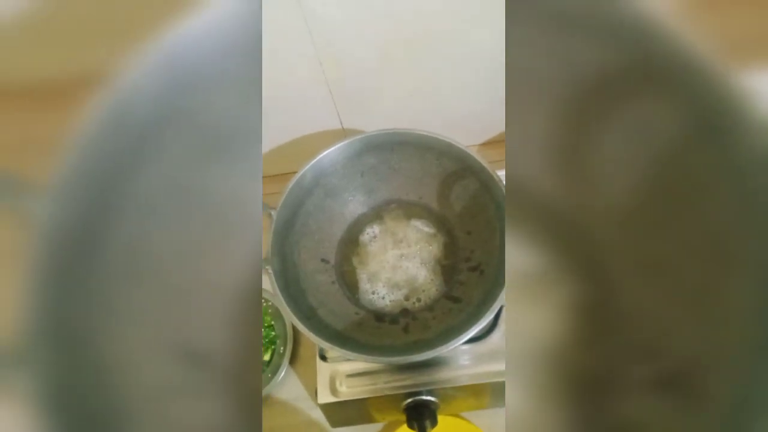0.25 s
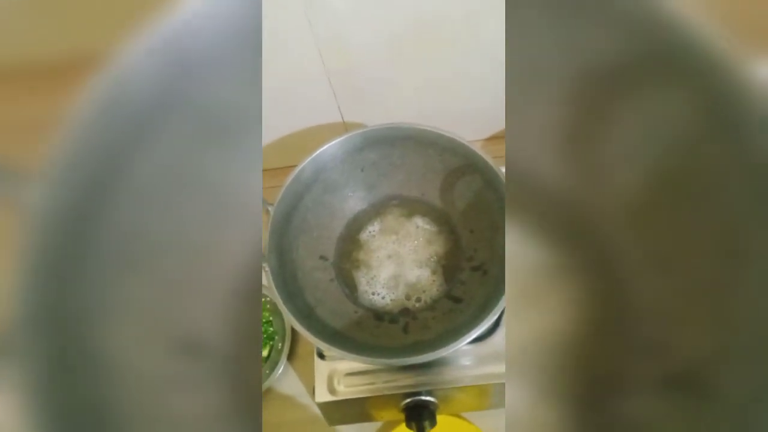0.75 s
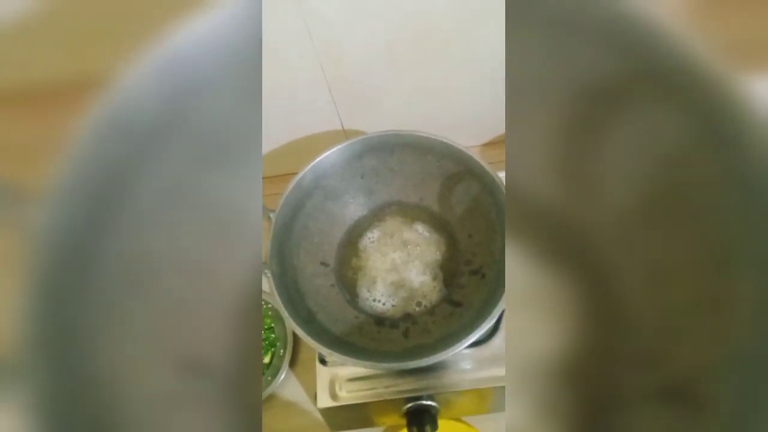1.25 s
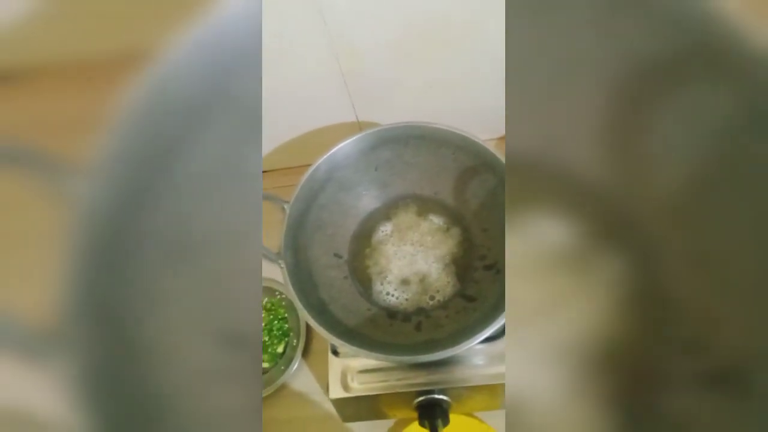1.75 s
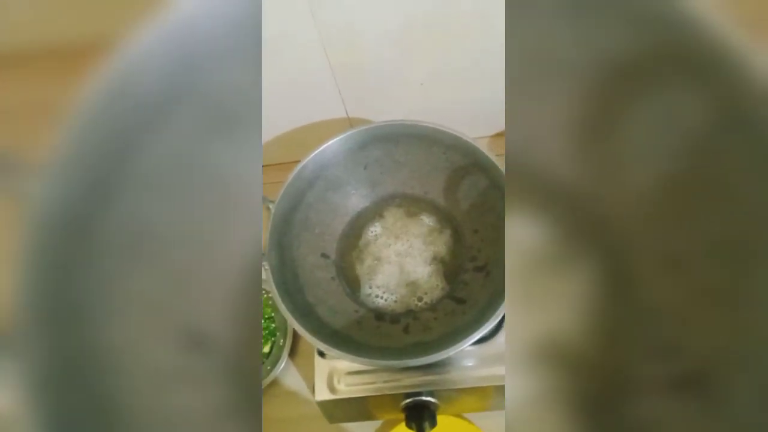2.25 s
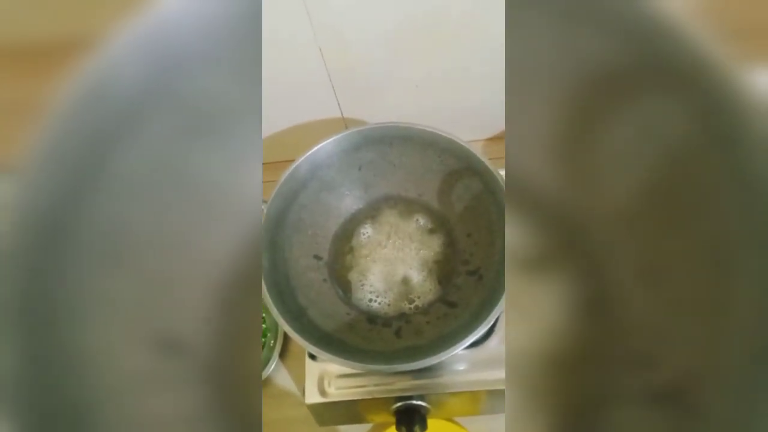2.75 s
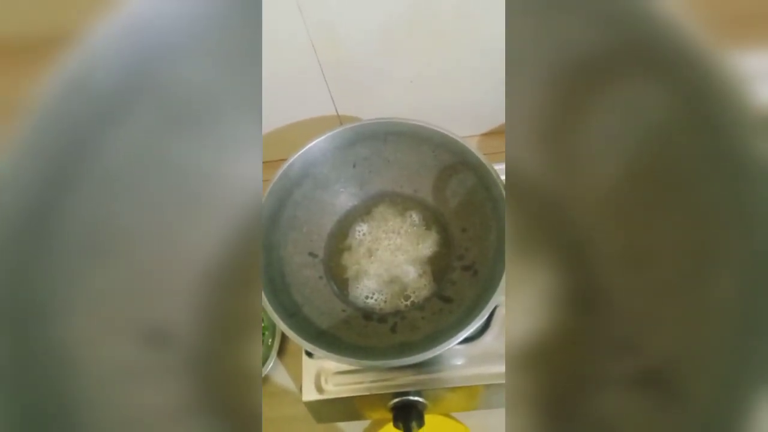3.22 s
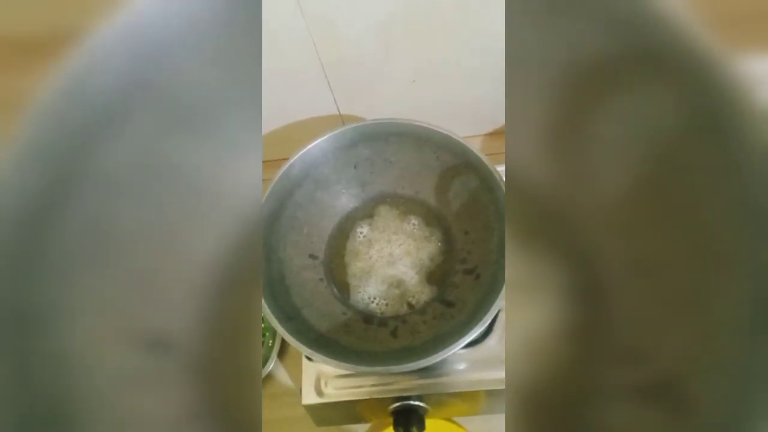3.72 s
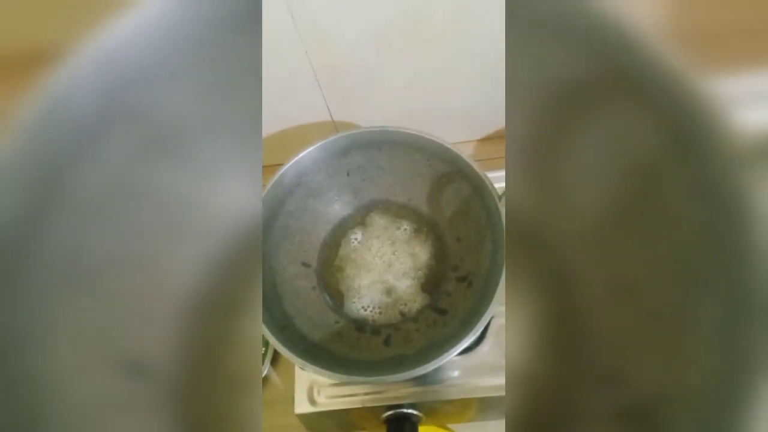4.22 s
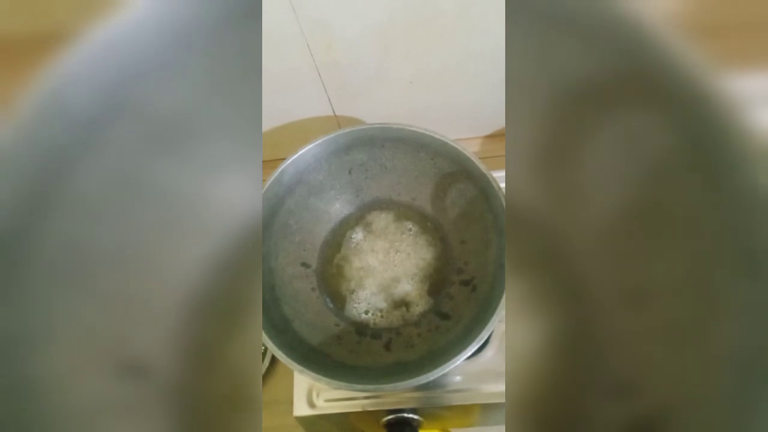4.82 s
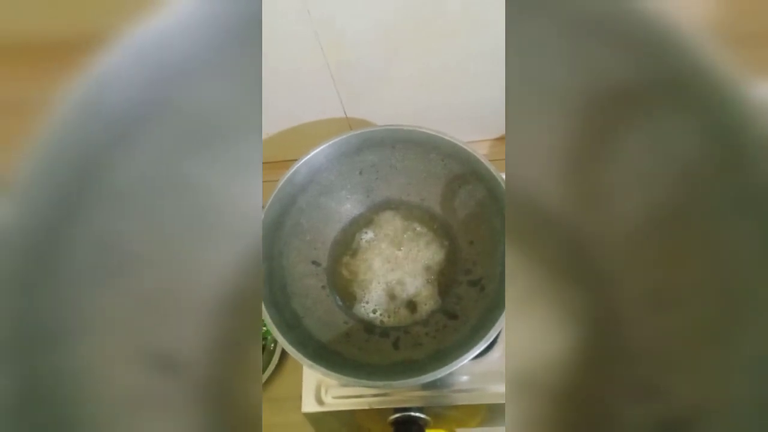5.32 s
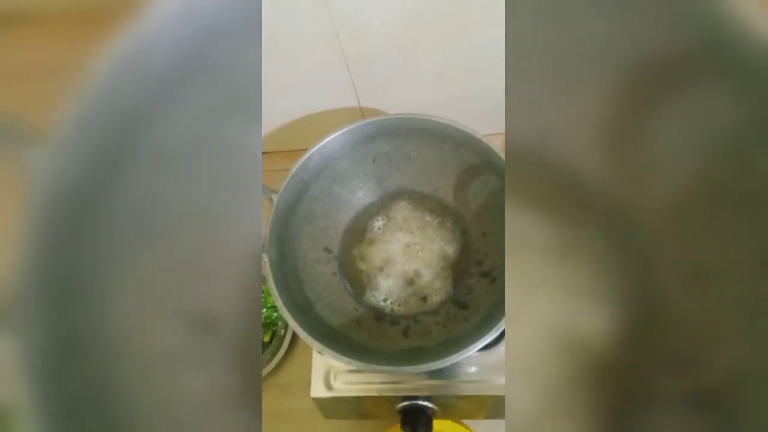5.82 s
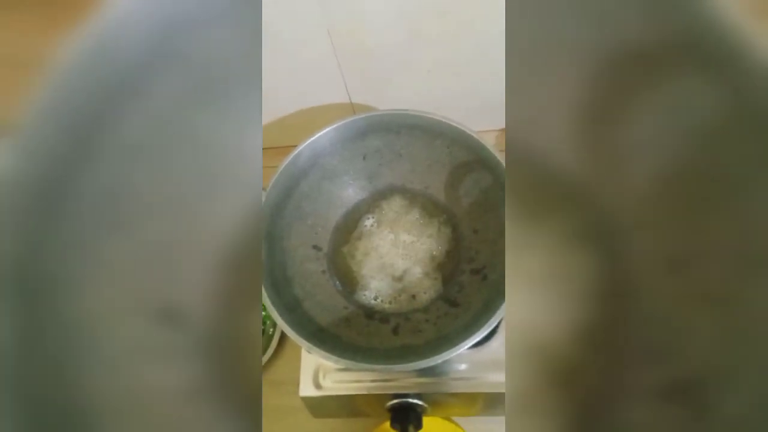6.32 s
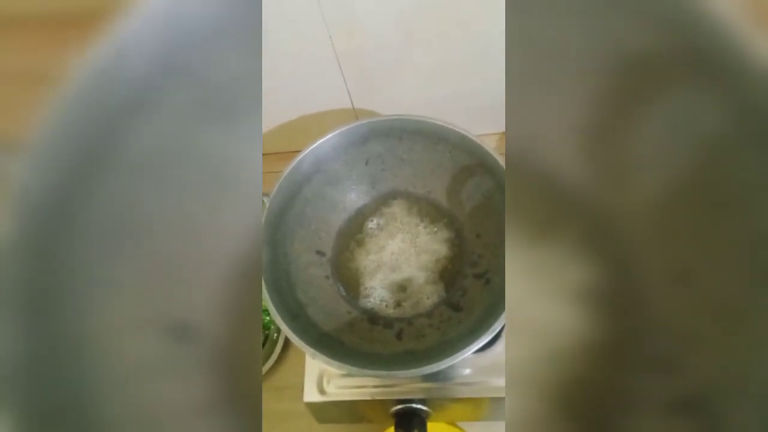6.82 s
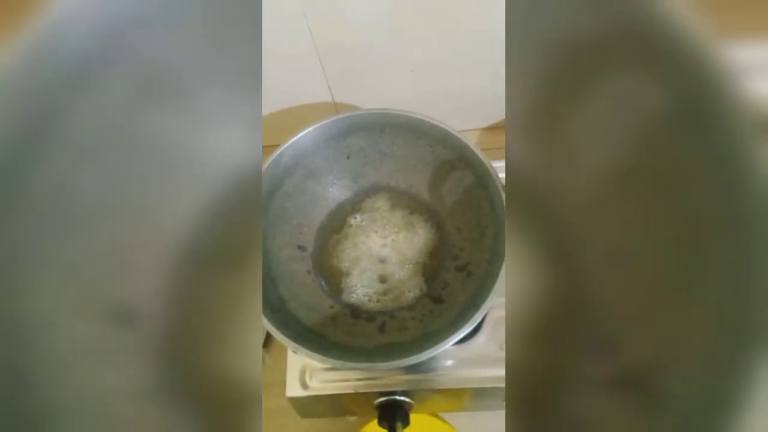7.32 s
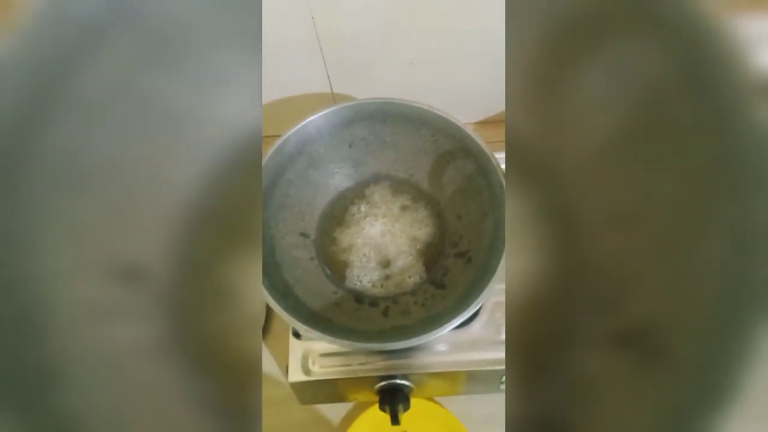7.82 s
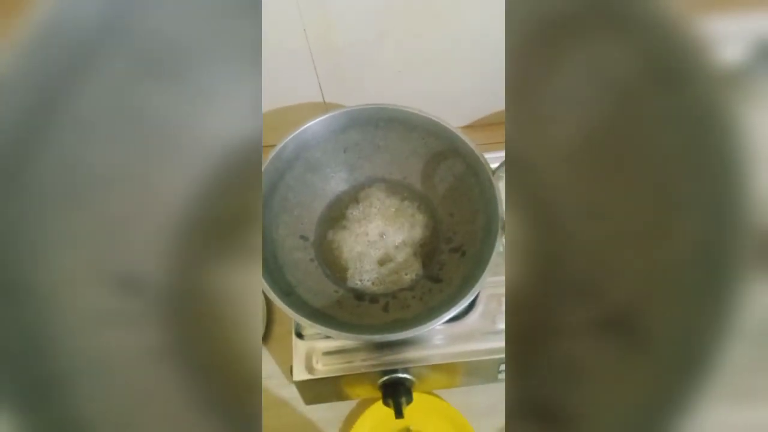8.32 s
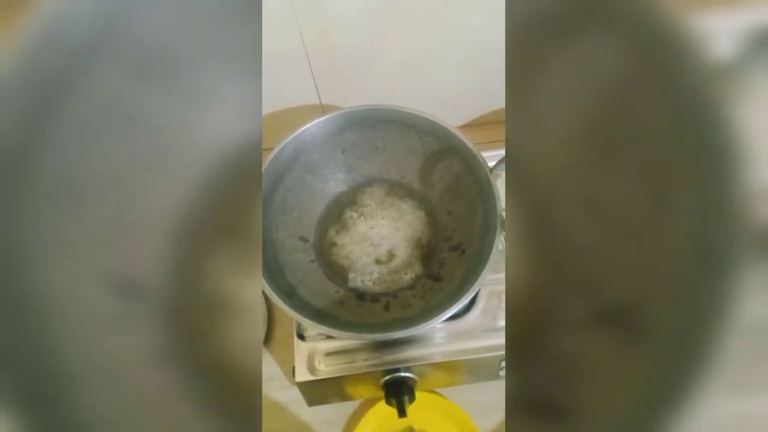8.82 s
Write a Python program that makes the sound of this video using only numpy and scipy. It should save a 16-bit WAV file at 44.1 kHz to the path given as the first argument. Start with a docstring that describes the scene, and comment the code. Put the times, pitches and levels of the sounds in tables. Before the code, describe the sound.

Close phone pickup of seeds popping in a steel frying pan. Irregular clicks and hollow pops of varied loudness, some sharply cracking, echo briefly off hard kitchen walls. A thin patchy sizzle grows slowly underneath, with low bubbling plops and bright spitting droplets. Dull knocks sound farther off in the room now and then. The popping bunches into a dense flurry towards the end, with one of the loudest bursts just before it stops.

```python
"""Mustard seeds bursting in hot oil

Seeds burst in a round steel pan under a phone: damped-sine pops, snaps and noise cracks.
The pan rings on and a noise-tail reverb is the tiled kitchen. Steam bubbles plop as low damped sines,
froth crackles, droplets spit as filtered noise, oil fizzes as patchy noise with ticks. Further off: dull
knocks of noise and modes. Two faint squeaks are sines; a low rumble is noise in narrow wavering bands.
"""
import sys
import numpy as np
from scipy import signal
from scipy.fft import rfft, irfft, next_fast_len
from scipy.io import wavfile
from scipy.ndimage import uniform_filter1d

SR = 44100
rng = np.random.default_rng(int(sys.argv[2]) if len(sys.argv) > 2 else 0)


def file_out(sig):
    """Save sig as 16-bit WAV at sys.argv[1]."""
    # one column per channel
    cols = np.atleast_2d(sig).T
    # limit, then scale
    lim = np.clip(cols, -1, 1)
    pcm = np.round(lim * 32767).astype(np.int16)
    wavfile.write(sys.argv[1], SR, pcm)


N = 399546


def amp(db):
    """Decibels to amplitude."""
    return 10 ** (np.asarray(db) / 20)


def unit(x):
    """Scale to unit RMS."""
    return x / np.sqrt(np.mean(x ** 2) + 1e-20)


def along(points, hz):
    """Interpolate (frequency [Hz], value) points on a log-frequency axis."""
    f, value = np.transpose(points)
    return np.interp(np.log(hz + 1), np.log(f + 1), value)


def curve(rows):
    """Interpolate (time [s], value) rows to one value per sample."""
    return np.interp(np.arange(N) / SR, *np.transpose(rows))


def coloured(x, spectrum):
    """Minimum-phase filter, via the folded cepstrum of (frequency [Hz], gain [dB]) points."""
    size = 2 * next_fast_len(N // 2 + SR // 4)
    log_gain = along(spectrum, np.fft.rfftfreq(size, 1 / SR)) * np.log(10) / 20
    cepstrum = irfft(log_gain, size)
    cepstrum[1:size // 2] *= 2
    cepstrum[size // 2 + 1:] = 0
    return irfft(rfft(x, size) * np.exp(rfft(cepstrum)), size)[:N]


def placed(times_s, shapes):
    """Sum the rows of shapes, each laid down at its time."""
    at = np.round(times_s * SR).astype(int)[:, None] + np.arange(shapes.shape[1])
    return np.bincount(at.ravel(), shapes.ravel(), N + SR)[:N]


def rings(times_s, db, hz, t60_s, rise_s, size):
    """Resonances: exponentially damped sines with a soft start."""
    t = np.arange(size) / SR
    envelope = amp(-60 * t / t60_s) * (1 - np.exp(-t / rise_s))
    return placed(times_s, amp(db)[:, None] * envelope * np.sin(2 * np.pi * hz[:, None] * t))


def bursts(times_s, db, t60_s, size, lumpy_db=0):
    """Decaying white noise; lumpy_db sets slow level swings that break it into separate echoes."""
    t = np.arange(size) / SR
    noise, lumps = rng.standard_normal((2, len(times_s), size))
    lumps = unit(uniform_filter1d(lumps, 130))
    return placed(times_s, amp(db[:, None] - 60 * t / t60_s + lumpy_db * lumps) * noise)


def blips(times_s, db, wave, rise_s, round_off):
    """Wavelets that swell for rise_s, then die; a low round_off lets them linger."""
    u = np.arange(wave.shape[1]) / SR / rise_s
    envelope = (u * np.exp(1 - u)) ** round_off
    return placed(times_s, amp(db)[:, None] * envelope * wave)


def sines(hz, size, sag=0):
    """One sine a row; pitch starts high by 1.5 * sag and settles with a 1.4 ms time constant."""
    t = np.arange(size) / SR
    return np.sin(2 * np.pi * hz[:, None] * (t + sag * 0.0021 * (1 - np.exp(-t / 0.0014))))


def sprays(times_s, db, colour):
    """A noise click, a short spray behind it and the ceiling's later echo, all through one filter."""
    ceiling_delay_s = 0.0115
    click_noise = rng.standard_normal((len(times_s), 200))
    click = blips(times_s, db, click_noise, rise_s=0.00045, round_off=6.1)
    spray = bursts(times_s, db - 9.0, t60_s=0.036, size=800)
    ceiling = bursts(times_s + ceiling_delay_s, db - 11.0, t60_s=0.037, size=1200)
    return coloured(click + spray + ceiling, colour)


# Fizz RMS: (time [s], level [dB])
FRY_LEVEL = [(0.0, -65), (0.3, -77.5), (1.29, -57.5), (1.87, -66), (2.22, -64.5), (5, -60.5), (8.35, -58),
             (9.06, -57.5)]
# Fizz spectrum: (frequency [Hz], relative gain [dB])
FIZZ_TONE = [(88, -45), (150, -27.5), (443, -1.5), (524, 6), (935, -1.5), (1440, 0.5), (2130, 4),
             (3090, -6.5), (6890, -8), (13000, -30)]
PATCHY_DB = 3  # RMS of the hiss level swings
TICK_MIN_DB, TICK_RANGE_DB = 3, 10  # against the hiss, before the tick filter


def fizz(count=4000):
    """Frying: hiss, patchy in time and frequency, with tiny bubbles as ticks of noise."""
    bins = signal.stft(rng.standard_normal(N), nperseg=512)[2]
    field = rng.standard_normal(bins.shape)
    field = uniform_filter1d(uniform_filter1d(field, 6, 0), 8, 1)
    hiss = signal.istft(bins * amp(PATCHY_DB * unit(field)), nperseg=512)[1]
    hiss = unit(hiss[:N])
    u = rng.random((count, 2))
    tick_s = u[:, 0] * (N - 1) / SR
    ticks = bursts(tick_s, TICK_MIN_DB + TICK_RANGE_DB * u[:, 1], t60_s=0.0055, size=150)
    ticks = coloured(ticks, [(800, -25), (2000, 0)])  # too small for bass
    return amp(curve(FRY_LEVEL)) * unit(coloured(hiss + ticks, FIZZ_TONE))


# Rumble RMS: (time [s], level [dB])
RUMBLE_LEVEL = [(0.0, -81), (1.49, -76), (8.86, -79.5), (9.06, -66)]
# Rumble bands: (centre [Hz], full width at half amplitude [Hz], relative level [dB])
RUMBLE_BANDS = [(48, 8.7, -34), (90.6, 9.4, 1), (132.8, 8.4, -2.5)]


def rumble():
    """Low rumble: noise in narrow wavering bands."""
    f = np.fft.rfftfreq(N, 1 / SR)
    shape = sum(amp(db) / (1 + (2 * (f - c) / width) ** 2) for c, width, db in RUMBLE_BANDS)
    shape = shape / (1 + (45 / (f + 1)) ** 4)  # deep-bass cut
    return amp(curve(RUMBLE_LEVEL)) * unit(irfft(rfft(rng.standard_normal(N)) * shape, N))


# Prominent bursts: (time [s], level [dB], pitch [Hz], treble against level [dB])
SEED_BURSTS = [(0.1678, -32, 2100, -13.5), (0.4632, -29, 2100, -19), (0.5297, -22, 2350, -24),
               (0.5914, -28, 2640, -12.5), (0.6956, -35.5, 2300, -10), (0.8142, -25.5, 1690, -34),
               (0.854, -33, 2440, -3), (0.8876, -30, 1700, -16), (1.0248, -30, 2200, -20),
               (1.105, -24, 2350, -14), (1.294, -22, 2310, -14.5), (1.3451, -21, 2210, -19),
               (1.4557, -29, 1920, -30), (1.4729, -21, 2400, -14.5), (1.6194, -33.5, 2280, -17),
               (1.8482, -34, 2350, -19), (2.0345, -30, 2600, -12), (2.087, -16.5, 2320, -15),
               (2.1191, -34, 2220, -28), (2.2207, -37, 2100, -12), (2.3103, -30, 2360, -11.5),
               (2.35, -45, 2040, -9.5), (2.3795, -30.5, 2230, -17), (2.388, -28.5, 2020, -22),
               (2.4207, -33, 2150, -13), (2.4563, -33.5, 2060, -14.5), (2.5222, -26.5, 2500, -11.5),
               (2.5494, -29, 2330, -5.5), (2.5641, -29, 2000, -5.5), (2.6224, -28, 2000, -14),
               (2.6494, -30.5, 2200, -16), (2.7578, -33, 2100, -15), (2.7786, -43, 2090, -9.5),
               (2.8739, -39, 2360, -27), (2.918, -36, 2200, -13), (2.9527, -26, 2160, -28),
               (3.0669, -30, 2130, -11), (3.0728, -28.5, 2210, -16), (3.1163, -35, 3100, -19),
               (3.2459, -26, 2100, -14.5), (3.3213, -35, 2300, -2.5), (3.3796, -32.5, 1880, -20),
               (3.4265, -33.5, 1920, -26), (3.4715, -31, 2150, -17), (3.5333, -22.5, 2100, -25.5),
               (3.5504, -32.5, 2090, -12), (3.606, -33, 2320, -19.5), (3.6709, -23, 2100, -20.5),
               (3.7035, -36, 2230, -12.5), (3.7887, -41, 2050, -13), (3.8355, -35, 2130, -9.5),
               (3.908, -31, 2300, -6), (3.982, -33, 2240, -22), (3.992, -36.5, 2230, -17),
               (4.1659, -33.5, 2030, -12), (4.2408, -27, 2090, -16), (4.2638, -31.5, 2170, -7),
               (4.3536, -25.5, 2470, -10.5), (4.3944, -35.5, 2130, -15), (4.4431, -31.5, 2230, -17),
               (4.5067, -28.5, 2300, -14.5), (4.5303, -26, 2170, -11.5), (4.667, -32.5, 2160, -11.5),
               (4.6992, -26.5, 2290, -22), (4.7408, -26, 2320, -11), (4.7591, -26, 2800, -12),
               (4.8, -28, 2290, 0.5), (5.029, -20, 1820, -16), (5.1415, -31.5, 2140, -16),
               (5.1652, -30.5, 2220, -15), (5.1928, -34.5, 2320, -16), (5.2228, -32.5, 2190, -29),
               (5.3183, -33, 2180, -22), (5.3507, -26.5, 2150, -29), (5.3568, -26, 2590, -12.5),
               (5.4793, -22.5, 2130, -25), (5.4887, -31, 1930, -3.5), (5.5695, -25, 2110, -19),
               (5.6341, -33.5, 2200, -14), (5.7399, -29.5, 2150, -11), (5.831, -21, 2250, -18.5),
               (5.84, -32.5, 1930, -16), (5.9349, -18, 2180, -12.5), (5.9943, -35, 2030, -11),
               (6.0384, -25, 1900, -10.5), (6.1539, -30.5, 2480, -13), (6.1627, -33, 2770, -15),
               (6.209, -28, 2600, -10), (6.2816, -31.5, 2480, -21), (6.2973, -32.5, 2760, -12),
               (6.302, -33, 2900, -16), (6.317, -27, 2540, -15), (6.3578, -25, 1980, -20),
               (6.3712, -35, 2000, -14), (6.3892, -28.5, 2270, -26), (6.3985, -32, 2080, -4),
               (6.4092, -23.5, 2020, -16.5), (6.4651, -24, 2300, -14), (6.557, -26.5, 2150, -22),
               (6.5634, -29.5, 2060, -10.5), (6.6558, -30.5, 2070, -26), (6.7849, -21.5, 2140, -15),
               (6.8457, -23.5, 2100, -17), (6.998, -23.5, 2180, -18.5), (7.0947, -27.5, 2450, -13),
               (7.1377, -35, 2320, -19), (7.1482, -33, 2030, -26), (7.2255, -33, 1940, -21),
               (7.2549, -27, 2020, -15.5), (7.2796, -28.5, 2070, -11), (7.3431, -36, 2200, -13),
               (7.423, -27, 2410, -22), (7.5322, -34.5, 2790, -6), (7.5454, -34, 2160, -12),
               (7.649, -26, 1980, -14.5), (7.7323, -34, 2180, -12), (7.7982, -41, 2300, -13),
               (7.8645, -45, 2470, -12), (7.889, -37, 2130, -6.5), (7.957, -34, 2840, -26),
               (7.9829, -22, 2180, -18.5), (8.091, -29.5, 2100, -25.5), (8.1637, -48, 2070, -7),
               (8.254, -30, 2520, -16), (8.2733, -32.5, 2080, -16), (8.3003, -30, 2350, -17),
               (8.3594, -34.5, 2250, -6), (8.391, -28, 2240, -13), (8.4459, -20, 2140, -24),
               (8.477, -26, 2260, -14), (8.5104, -22.5, 2320, -15.5), (8.542, -26, 2280, -17),
               (8.5618, -28, 2780, -18), (8.6258, -26.5, 2170, -25), (8.6422, -26.5, 2220, -17),
               (8.6605, -27, 2300, -11), (8.6681, -22.5, 2200, -20), (8.6824, -34, 1980, -19),
               (8.7045, -27, 2590, -20), (8.717, -28.5, 2110, -20), (8.763, -31, 2050, -11.5),
               (8.8025, -28, 2400, -23), (8.8535, -36, 2060, -7), (8.8599, -33.5, 1980, -7.5),
               (8.8835, -29, 2010, -10), (8.9279, -15, 2300, -14), (8.935, -24, 2010, -10)]
SMALL_MIN_DB, SMALL_SPREAD_DB = -42, 2  # floor, mean excess
SMALL_MIN_HZ, SMALL_MAX_BRIGHT_DB = 2100, -8


def all_pops(count=45):
    """Listed bursts plus faint random ones, denser where the oil fries harder."""
    u = rng.random((count, 4))
    heat = np.cumsum(amp(curve(FRY_LEVEL)))
    s = np.interp(u[:, 0], heat / heat[-1], np.arange(N) / SR)
    db = SMALL_MIN_DB - SMALL_SPREAD_DB * np.log(1 - u[:, 1])
    hz = SMALL_MIN_HZ * 1.55 ** (u[:, 2] ** 2)
    bright_db = SMALL_MAX_BRIGHT_DB - 10 * u[:, 3]
    return np.hstack([np.transpose(SEED_BURSTS), [s, db, hz, bright_db]])


# Crack spectrum: (frequency [Hz], gain [dB])
CRACK_TONE = [(800, -73), (3000, -50), (4800, -2.5), (7000, -4.5), (8500, -18), (11000, -28.5),
              (13500, -35.5), (15200, -24)]
# Steel bowl and the air in it: (frequency [Hz], relative level [dB], t60 [s])
PAN_MODES = [(521.5, -45, 0.53), (584.5, -44.5, 0.21), (844, -29, 0.067), (1261, -21.5, 0.042),
             (2184, -7.5, 0.02)]
POP_DB, PAN_DB = -1.5, -4  # offsets from burst level
SNAP_DB, CRACK_DB = 5.5, 12  # offsets from burst level + treble
SNAP_SCATTER_DB = 4  # plus or minus
ONSET_DELAY_S = 0.0006  # short delay from listed time to burst


def seeds(pops):
    """Husk split: a few cycles of pop with a higher snap and a noise crack; pan modes ring on."""
    s, db, hz, bright_db = pops
    s = np.minimum(s + ONSET_DELAY_S, N / SR)
    u = rng.random((len(s), 3))
    pop_wave = sines(hz, size=400, sag=0.08)
    pop = blips(s, db + POP_DB, pop_wave, rise_s=0.00045, round_off=1.15)
    snap_db = db + bright_db + SNAP_DB + SNAP_SCATTER_DB * (2 * u[:, 2] - 1)
    snap_wave = sines(3000 + 1400 * u[:, 0], size=400)
    snap = blips(s, snap_db, snap_wave, rise_s=0.0004, round_off=1.4)
    pan_db = db + PAN_DB + 6 * u[:, 1]
    pan = sum(rings(s, pan_db + mode_db, f + 0 * s, t60_s, rise_s=0.0032, size=9000)
              for f, mode_db, t60_s in PAN_MODES)
    return pop + snap + pan + sprays(s, db + bright_db + CRACK_DB, CRACK_TONE)


FROTH_DB = -14  # top level against the burst, before the lateness loss


def crackle(pops, count=8):
    """Stirred froth: smaller bubbles break right behind each burst, tending fainter when later."""
    s, db = np.repeat(pops[:2], count, axis=1)
    u = rng.random((len(s), 3))
    late_s = 0.0015 + 0.08 * u[:, 0] ** 3
    level_db = db + FROTH_DB - 10 * u[:, 1] - 12 * np.sqrt(late_s / 0.17)
    wave = sines(1700 * 2.33 ** u[:, 2], size=400)
    times_s = np.clip(s + late_s, 0, (N - 1) / SR)
    return blips(times_s, level_db, wave, rise_s=0.00071, round_off=0.75)


# Steam bubbles breaking the oil: (time [s], level [dB], pitch [Hz])
STEAM_PLOPS = [(0.471, -50, 550), (1.119, -49, 510), (2.243, -45.5, 593), (2.385, -37, 586),
               (3.246, -44, 845), (3.426, -36.5, 512), (4.012, -49.5, 581), (4.217, -49, 816),
               (4.326, -51.5, 505), (4.409, -41, 818), (4.487, -40, 530), (5.142, -46.5, 580),
               (5.341, -39.5, 548), (5.435, -44.5, 504), (5.518, -39.5, 550), (5.595, -44.5, 533),
               (6.186, -41, 512), (7.05, -47, 790), (7.299, -45, 568), (7.648, -43.5, 770),
               (7.83, -44, 520), (8.274, -36, 532), (8.627, -43, 540), (8.92, -48, 603)]


def bubbles():
    """Large steam bubbles: a short dull damped sine and a puff of filtered noise."""
    s, db, hz = np.transpose(STEAM_PLOPS)
    puff_tone = [(300, -10.5), (520, 3.5), (800, 12), (1300, 2.5), (2500, -31)]
    puff = coloured(bursts(s, db, t60_s=0.024, size=2000), puff_tone)
    return rings(s, db - 2, hz, t60_s=0.045, rise_s=0.0025, size=3500) + puff


# Far knocks: (time [s], level [dB], rap against level [dB], mode drive against level [dB])
FAR_KNOCKS = [(0.808, -33.5, -14, -35), (0.883, -32, -10.5, -35), (1.182, -26.5, -15, -40.5),
              (1.239, -43, -18, -40), (1.772, -37.5, -20.5, -41), (2.911, -23.5, -12, -40.5),
              (3.484, -35, -20, -35), (4.644, -34, -21, -42), (4.655, -41, -5.5, -55),
              (6.554, -32.5, -17.5, -43)]
# Thud spectrum: (frequency [Hz], gain [dB])
THUD_TONE = [(120, -72), (250, -5.5), (400, -1), (650, -1.5), (1100, -8), (2000, -39.5)]
# Rap spectrum: (frequency [Hz], gain [dB])
RAP_TONE = [(700, -13.5), (1300, 7.5), (1900, 11.5), (3500, 2.5), (4500, -6.5), (7500, -2), (11000, -34),
            (16000, -48)]
# Room and cupboard modes: (frequency [Hz], relative level [dB], t60 [s])
ROOM_MODES = [(84.2, -19, 0.42), (190, -29.5, 0.62), (324.5, -13.5, 0.9), (341, -16.5, 0.46),
              (375.7, -11.5, 0.35), (517, -27, 0.29), (584.6, -9.5, 0.22), (1197, -6, 0.21),
              (1580, -14, 0.26), (2250, -18, 0.15), (3050, -33, 0.19), (3550, -23, 0.15)]


def knocks():
    """Knocks through the room: sudden lumpy noise that dies away, and noise-driven lingering modes."""
    s, db, rap_db, boom_db = np.transpose(FAR_KNOCKS)
    thud = coloured(bursts(s, db, t60_s=0.57, size=22000, lumpy_db=2.5), THUD_TONE)
    rap = coloured(bursts(s, db + rap_db, t60_s=0.52, size=22000, lumpy_db=1.5), RAP_TONE)
    t = np.arange(30000) / SR
    modes = sum(amp(level_db - 60 * t / t60_s) * np.sin(2 * np.pi * hz * t)
                for hz, level_db, t60_s in ROOM_MODES)
    modes = modes * (1 - np.exp(-t / 0.028))  # standing waves take time to build
    drive = bursts(s, db + boom_db, t60_s=0.47, size=22000)
    return thud + rap + signal.fftconvolve(drive, modes)[:N]


# Bright oil spits: (time [s], fizz level [dB], top against fizz [dB])
OIL_SPITS = [(0.855, -43.5, -19), (1.4728, -46, -29), (2.55, -36.5, -26), (2.915, -38.5, -19),
             (3.321, -38.5, -9), (4.264, -48.5, -19), (4.7995, -27, -24), (5.378, -46.5, -33),
             (5.7863, -46.5, -7), (5.9344, -61, 7), (7.5306, -35.5, -2), (7.653, -43, -12),
             (8.3601, -34, -5), (8.6602, -63, -3)]
# Spit fizz spectrum: (frequency [Hz], gain [dB])
SPIT_TONE = [(1500, -76), (6000, -3), (8500, -4.5), (10500, -6), (13500, -28), (16000, -29)]
# Microphone treble peak: (frequency [Hz], gain [dB])
SPIT_TOP_TONE = [(4000, -72), (12000, -12), (14000, 0), (15200, 10), (16500, -32)]


def spits():
    """Droplets flash to steam: noise sprays, the very top on the microphone's treble peak."""
    s, db, top_db = np.transpose(OIL_SPITS)
    return sprays(s, db + 9.0, SPIT_TONE) + sprays(s, db + top_db + 9, SPIT_TOP_TONE)


# Faint squeaks: (start [s], end [s], pitch [Hz], level [dB])
FAINT_SQUEAKS = [(2.792, 2.863, 645, -61), (2.87, 2.91, 634, -64)]


def squeaks():
    """Short soft tones: steady sines under half-sine envelopes."""
    t = np.arange(N) / SR
    out = np.zeros(N)
    for start_s, end_s, hz, db in FAINT_SQUEAKS:
        swell = np.sin(np.pi * np.clip((t - start_s) / (end_s - start_s), 0, 1))
        out += amp(db) * swell * np.sin(2 * np.pi * hz * t)
    return out


# Kitchen decay: (frequency [Hz], t60 [s])
KITCHEN_T60 = [(300, 0.3), (800, 0.44), (2000, 0.38), (5500, 0.53), (15000, 0.4)]
# Reverb tone: (frequency [Hz], gain [dB])
REVERB_TONE = [(300, 2), (1000, 2), (2500, -8), (6000, -3.5), (15000, -2)]


def kitchen(x, tail_db, count=60):
    """Dense decaying noise; each of count slices gets a new random tail, so the reverb varies."""
    size = N // count + 1
    hz, t, bins = signal.stft(rng.standard_normal((count, 26000)), SR, nperseg=256)
    decay = amp(-60 * t / along(KITCHEN_T60, hz)[:, None])
    tails = signal.istft(bins * decay, SR, nperseg=256)[1]
    tails = tails * np.clip(np.arange(tails.shape[1]) / SR / 0.005, 0, 1)  # 5 ms build-up
    tails = tails / np.linalg.norm(tails, axis=1, keepdims=True)
    slices = np.pad(x, (0, count * size - N)).reshape(count, size)
    wet = placed(np.arange(count) * size / SR, signal.fftconvolve(slices, tails, axes=1))
    return coloured(amp(tail_db) * wet, REVERB_TONE)


def scene():
    """Pan sounds excite the kitchen; fizz, knocks, squeaks and rumble bypass its reverb."""
    pops = all_pops()
    pan = seeds(pops) + spits() + bubbles() + crackle(pops)
    return (pan + kitchen(pan, tail_db=-1.5) + fizz() + knocks() + squeaks() + rumble())[None]


# Microphone self-noise spectrum: (frequency [Hz], relative gain [dB])
MIC_HISS_TONE = [(300, 7), (3000, -13.5), (8000, -2.5), (13000, -18), (15000, -6), (16000, -2)]
TOP_HZ = 15650  # band limit


def record(dry):
    """Phone: added self-noise, a second-order 50 Hz bass cut and a sharp upper band limit."""
    hz = np.fft.rfftfreq(N, 1 / SR)
    hiss = amp(-72.5) * unit(coloured(rng.standard_normal(N), MIC_HISS_TONE))
    bass_cut = 1 / (1 - 1j * 50 / (hz + 1)) ** 2
    return irfft(rfft(dry + hiss) * (hz < TOP_HZ) * bass_cut, N)


dry = scene()
out = record(dry)
file_out(out)
```